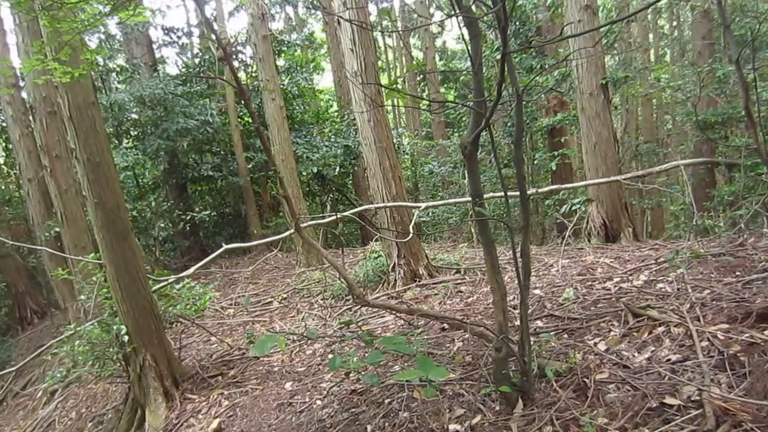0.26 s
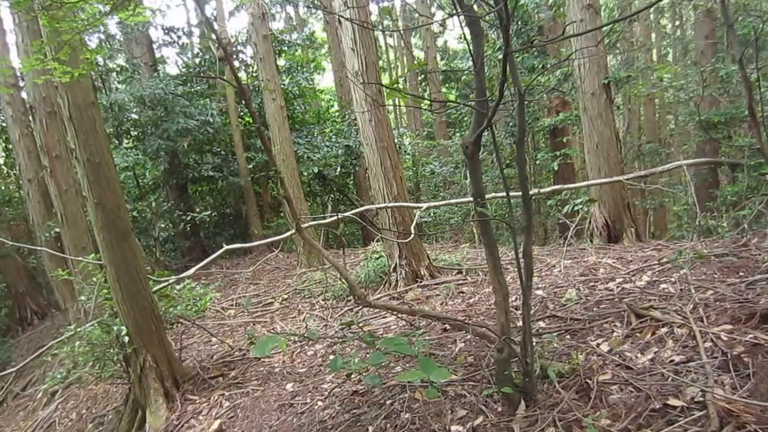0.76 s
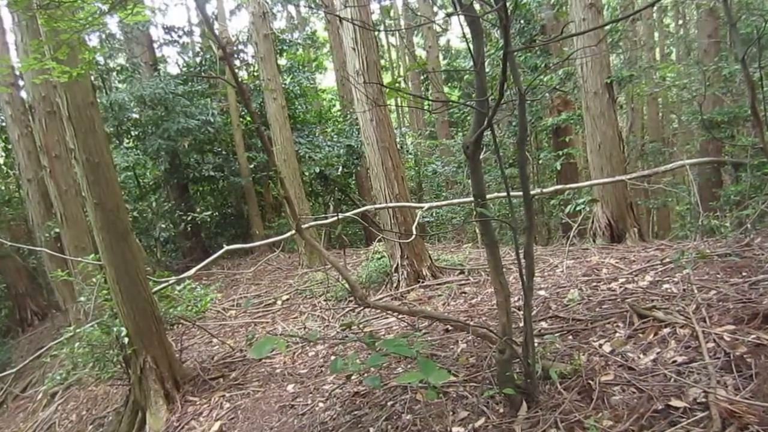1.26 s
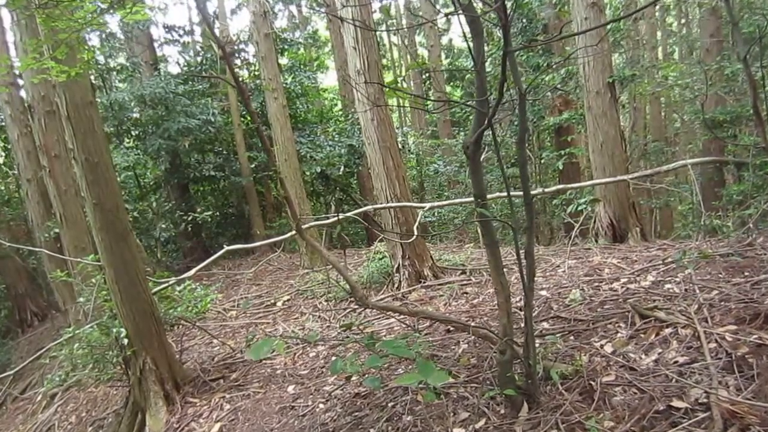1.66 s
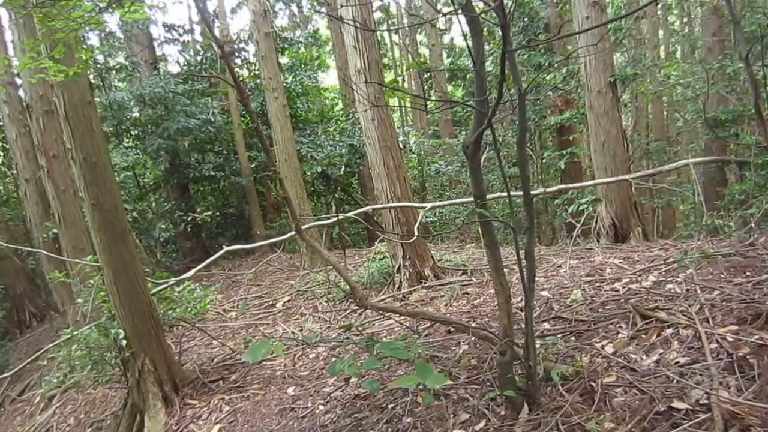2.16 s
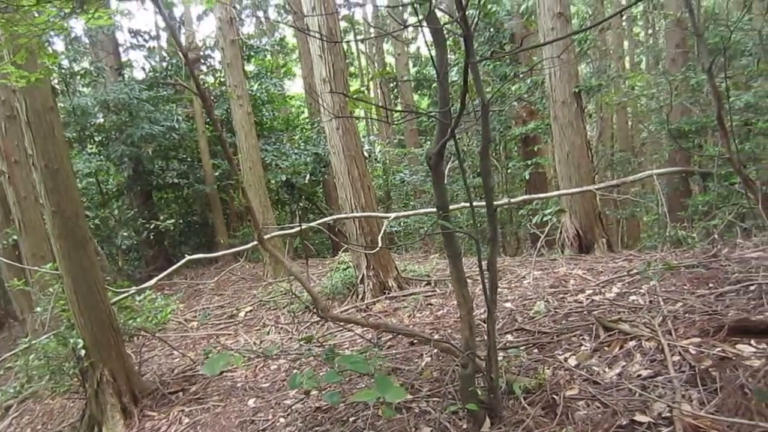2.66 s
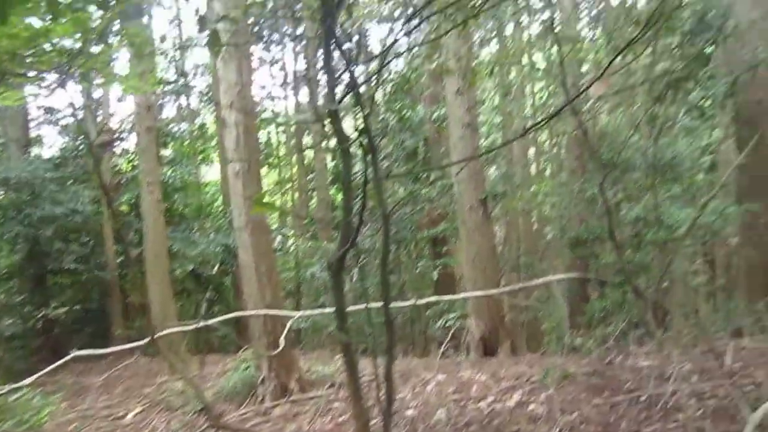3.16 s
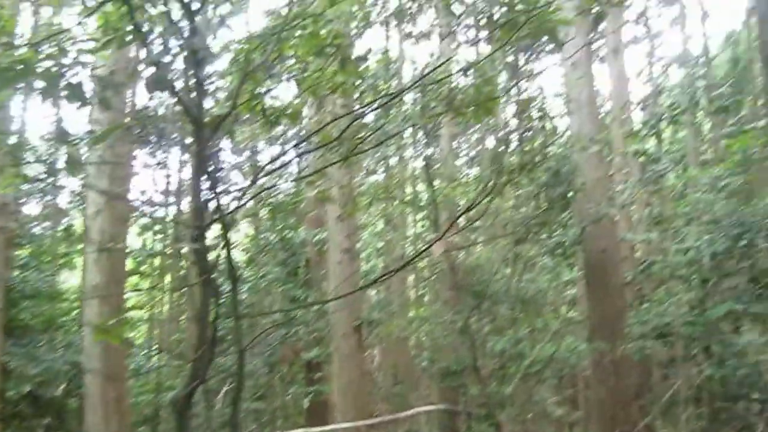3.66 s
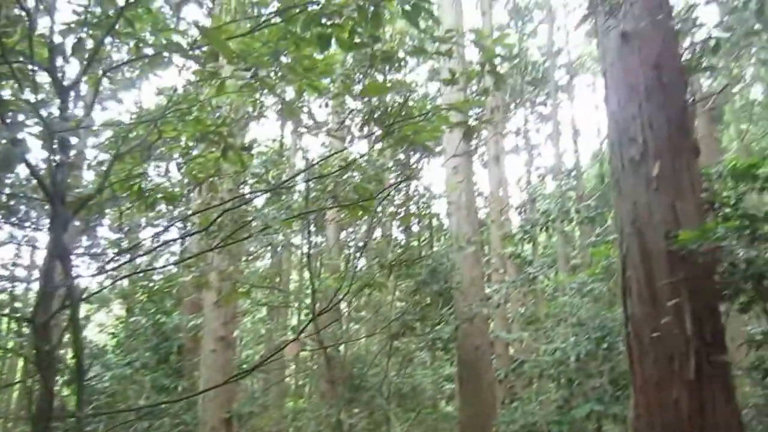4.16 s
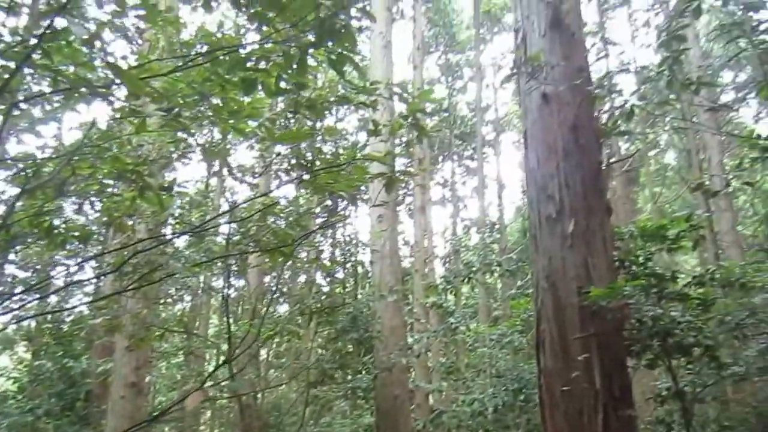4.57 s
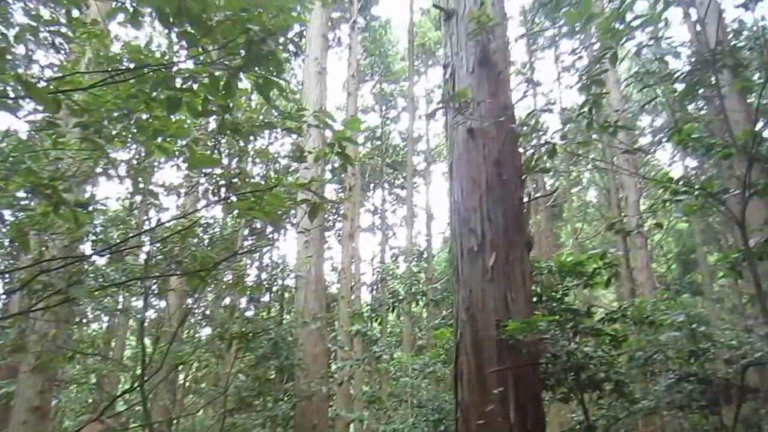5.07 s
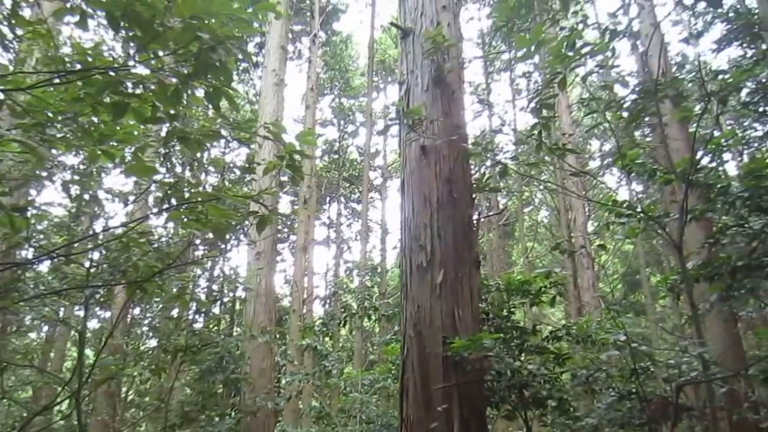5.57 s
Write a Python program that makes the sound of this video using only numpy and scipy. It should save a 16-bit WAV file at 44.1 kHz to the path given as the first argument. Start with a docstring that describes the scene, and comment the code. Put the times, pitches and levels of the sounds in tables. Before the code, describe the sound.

A small bird whistles a few sliding notes, then repeats a clear, high three-note phrase over a low forest hush.

```python
"""A songbird in a cedar wood

A small bird whistles a few sliding notes, then six three-note phrases, most ending in a downward sweep.
Each note is a nearly pure tone that scoops to its pitch; tree trunks scatter it into a fluttering tail.
Underneath are a few faint twig ticks, the low hush of the forest and the thin whine of a camera."""
import sys
import numpy as np
from scipy import signal
from scipy.fft import rfft, irfft
from scipy.io import wavfile

SR = 44100
rng = np.random.default_rng(int(sys.argv[2]) if len(sys.argv) > 2 else 0)


def store_wav(level_fs):
    """Save 16-bit WAV to argv[1]."""
    pcm = np.round(np.clip(np.atleast_2d(level_fs), -1, 1) * 32767)
    wavfile.write(sys.argv[1], SR, pcm.T.astype(np.int16))


N = 256662


def bird(waver_share=0.024, waver_hz=170):
    """The bird whistles its song, each note with its own quick wobble of pitch."""
    song, notes = np.zeros(N), song_notes()
    waver = waver_share * drift(waver_hz)
    wavers = np.array_split(np.tile(waver, 2), len(notes))
    for (start, *note), own_waver in zip(notes, wavers):
        add(song, start, whistle(note, own_waver))
    return song


def song_notes(slur_scoop_s=0.019, slur_octave_db=-27, second_call_s=0.08, long_note_after_s=0.106):
    """List the notes: opening slurs (slides), then phrases of two short calls and a long note."""
    # Each row: start and length in seconds, starting, held and ending pitch in Hz, level in dB,
    # swell over the note in dB, roughness from 0 to 1.
    slurs = [ (0.000, 0.07, 3490, 3517, 3460, -46.5, -8, .7),
             (0.072, 0.053, 3590, 4200, 4170, -41, -3, 0.25),
             (0.124, .044, 3610, 3617, 3592, -38.5, 2, .04),
             (0.317, .112, 2780, 2630, 2396, -45.6, 1.5, .2), (0.415, 0.096, 2675, 3806, 3846, -41, 4, .05),
             ]
    # Each row: start, first call's length, delay to the second call, long note's hold and
    # closing sweep's length, all in seconds, then level in dB.
    phrases = [ (1.036, .078, .245, 0.16, 0.067, -47.2), (1.878, .090, .215, .173, .075, -44.1),
               (2.856, 0.083, .197, .129, .070, -43.7), (3.685, 0.075, .207, .208, 0, -39.6),
               (4.493, .066, .214, .230, 0, -39.7), (5.303, .058, .190, .160, .085, -40.5), ]
    # Each note shape: scoop time in seconds, starting and held pitch in Hz, level within the phrase
    # in dB, swell in dB, roughness from 0 to 1, strength of the octave during the scoop in dB.
    first_call = (.016, 2100, 3200, .9, 9, .44, -25)
    second_call = (.0138, 1980.5, 3163, -.4, -1.5, 0.4, -18)
    long_note = (.009, 2619.5, 3172, 0.5, 2.5, 0.68, -27)
    notes = [(start, hold, slur_scoop_s, start_hz, held_hz, end_hz, db, swell, 0, rough, slur_octave_db)
             for start, hold, start_hz, held_hz, end_hz, db, swell, rough in slurs]
    for start, first_length, second_after, long_hold, sweep, db in phrases:
        second = start + second_after
        fade_db = 0 if sweep > 0 else 7  # with no closing sweep, the long note eases off
        notes += [phrase_note(first_call, start, first_length, db),
                  phrase_note(second_call, second, second_call_s, db),
                  phrase_note(long_note, second + long_note_after_s, long_hold, db, sweep, fade_db)]
    return notes


def phrase_note(shape, start, hold, db, sweep=0, fade_db=0):
    """One note of a phrase: it sits higher when sung louder and creeps upward while held."""
    effort_hz_per_db, full_voice_db, climb_hz_per_s = 4, -40, 540
    scoop, start_hz, held_hz, own_db, swell_db, rough, octave_db = shape
    held_hz += effort_hz_per_db * (db - full_voice_db)
    end_hz = held_hz + climb_hz_per_s * hold
    return (start, hold, scoop, start_hz, held_hz, end_hz,
            db + own_db, swell_db - fade_db, sweep, rough, octave_db)


def whistle(note, waver, attack_s=0.014, release_s=0.012):
    """A tone shaped by the bird's throat: it scoops to a held pitch, wavers, and may sweep down."""
    # The throat favours the pitch it is tuned to. Each row: pitch divided by that tuning, gain in dB.
    throat = [(0.602, -31), (.72, -11.5), (0.859, -4), (1, 0.5), (1.2, -9)]
    # The levels in dB of the overtones at two and three times the pitch.
    overtones_db = [-39, -53.5]
    sweep_hz_per_s, steepen_per_s, sweep_onset_s, sweep_db = 8000, 10.95, 0.011, -35.5
    hold, scoop, start_hz, held_hz, end_hz, db, swell_db, sweep, rough, octave_db = note
    length = hold + sweep
    t = np.arange(int(length * SR)) / SR
    progress = np.minimum(t / hold, 1)
    sweep_time = np.maximum(t - hold, 0)
    scooping = np.exp(-(t / scoop) ** 2)
    push = 1 - np.exp(-sweep_time / sweep_onset_s)  # the closing sweep grows loud and clean
    fall_hz = sweep_hz_per_s * sweep_time * (1 + steepen_per_s * sweep_time)
    tuned_hz = held_hz + (end_hz - held_hz) * progress
    hz = tuned_hz + (start_hz - held_hz) * scooping - fall_hz
    wobble = 1 + rough * (1 - push) * waver[:len(t)]
    phase = 2 * np.pi * np.cumsum(hz * wobble) / SR
    throat_hz = tuned_hz - 0.13 * fall_hz  # the throat partly follows the sweep down
    throat_gain = undb(np.interp(hz / throat_hz, *np.transpose(throat)))
    overtones = sum(undb(level) * np.sin(k * phase) for k, level in enumerate(overtones_db, 2))
    # at the bottom of a deep scoop the throat favours the octave above
    octave = undb(octave_db) * scooping * (1 - throat_gain) * np.sin(2 * phase)
    tone = throat_gain * np.sin(phase) + (1 - push) * overtones + octave
    fade_in = np.sin(np.pi / 2 * np.minimum(t / attack_s, 1))
    fade_out = np.sin(np.pi / 2 * np.minimum((length - t) / release_s, 1))
    level_db = (1 - push) * db + push * sweep_db + swell_db * (progress - 0.5)
    return np.sqrt(2) * tone * fade_in * fade_out * undb(level_db)


def forest_echoes(song, near_db=-3, near_fade_s=0.19, far_db=-7, far_fade_s=0.61):
    """Near trunks throw back separate echoes; the wood beyond blurs them into a dense tail."""
    t = np.arange(SR) / SR
    trunks = rng.standard_normal(SR) * (rng.random(SR) < 500 / SR)  # about 500 echoes a second
    trunks *= undb(-60 * t / near_fade_s)
    trunks /= np.linalg.norm(trunks)
    trunks[0] = 0.85  # the direct sound, half hidden by leaves
    build_up = 1 - np.exp(-t / 0.016)
    wood = rng.standard_normal(SR) * undb(-60 * t / far_fade_s) * build_up
    wood /= np.linalg.norm(wood)
    return signal.fftconvolve(song, undb(near_db) * trunks + undb(far_db) * wood)[:N]


def twigs():
    """Twigs give small dry ticks: quickly dying bursts of noise, each in one broad band."""
    # Each row: start in seconds, level before filtering in dB, band centre in Hz, decay in seconds.
    ticks = [(3.398, -53, 4500, 0.0018), (3.465, -56, 3500, .002), (3.67, -48, 3800, 0.0045),
             (3.782, -50.5, 5030, .002), (4.238, -36.5, 587, 0.0077)]
    track, t = np.zeros(N), np.arange(SR // 20) / SR
    for start, db, hz, decay in ticks:
        band = signal.butter(4, [hz / 2, min(hz * 2, 9000)], "band", fs=SR, output="sos")
        burst = undb(db) * rng.standard_normal(len(t)) * np.exp(-t / decay)
        add(track, start, signal.sosfilt(band, burst))
    return track


def hush(level_db=-54):
    """Distant air in the trees makes a steady, low noise."""
    # Each row: frequency in Hz, relative strength of the noise there in dB.
    spectrum = [(20, -6), (55, 1), (100, -3), (160, -7), (300, -9), (550, -15), (1100, -19), (2200, -23.5),
                (4500, -31), (8500, -36.5), (10300, -44.5), (11600, -58.5), (13500, -51), (15500, -56)]
    return coloured_noise(spectrum) * undb(level_db)


def camera(fizz_db=-77, fizz_lead_s=0.023, fizz_length_s=0.25):
    """The camera's electronics give a low hum, a thin whine and a soft fizz once a second."""
    # Each row is a steady tone: frequency in Hz, level in dB.
    whine = [(58, -66), (13167, -91.5), (15703, -97.5), (15735, -97)]
    # Each row: frequency in Hz, relative strength of the fizz there in dB.
    fizz_spectrum = [(4700, -34), (5300, -0.5), (5600, 2), (6200, -20.5), (8900, -12), (10000, -29),
                     (10850, -10), (11300, -32)]
    t = np.arange(N) / SR
    tones = sum(np.sqrt(2) * undb(db) * np.sin(2 * np.pi * (hz * t + rng.random())) for hz, db in whine)
    fizz_on = (t + fizz_lead_s) % 1 < fizz_length_s
    return tones + undb(fizz_db) * coloured_noise(fizz_spectrum) * fizz_on


def undb(db):
    """Turn decibels into a multiplier."""
    return 10 ** (np.asarray(db) / 20)


def unit(x):
    """Scale a signal so its average level (rms) is 1."""
    return x / np.sqrt(np.mean(x ** 2))


def add(track, start, sound):
    """Mix a sound into the track at a time in seconds."""
    i = max(int(start * SR), 0)
    track[i:i + len(sound)] += sound[:max(N - i, 0)]


def drift(rate):
    """Smooth random wandering of level 1, changing about rate times a second."""
    hz = np.arange(N // 2 + 1) * SR / N
    return unit(irfft(rfft(rng.standard_normal(N)) * np.exp(-(hz / rate) ** 2), N))


def coloured_noise(points):
    """Noise of level 1 whose spectrum follows the given (Hz, dB) points."""
    hz, db = np.transpose(points)
    bins = np.maximum(np.arange(N // 2 + 1) * SR / N, 1)
    gain = undb(np.interp(np.log(bins), np.log(hz), db))
    return unit(irfft(rfft(rng.standard_normal(N)) * gain, N))


def scene():
    """The bird among the trees over the quiet background, in mono."""
    return (forest_echoes(bird()) + twigs() + hush() + camera())[None]


def record(dry):
    """The recorder cuts the highest treble."""
    top_hz = 15800
    return signal.sosfilt(signal.ellip(10, 0.1, 70, top_hz, fs=SR, output="sos"), dry)


dry = scene()
out = record(dry)
store_wav(out)
```